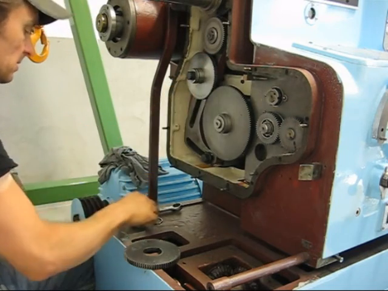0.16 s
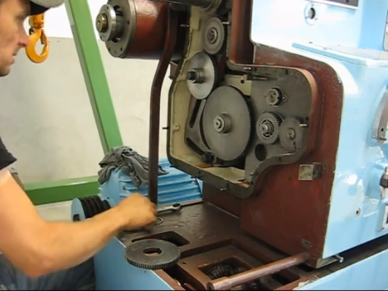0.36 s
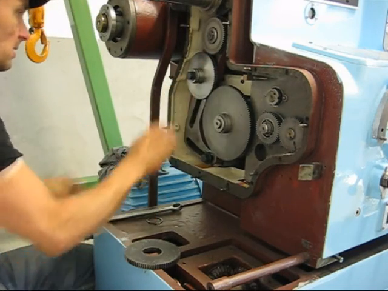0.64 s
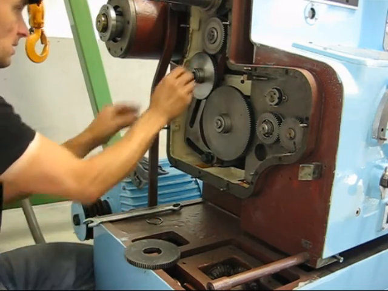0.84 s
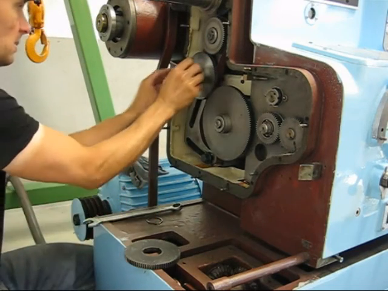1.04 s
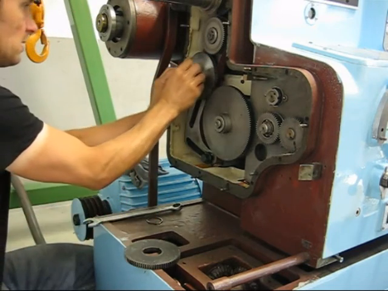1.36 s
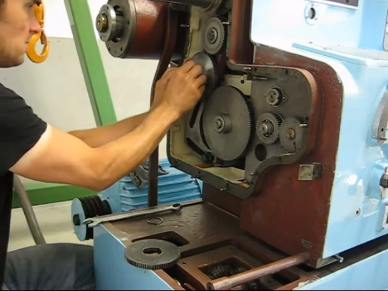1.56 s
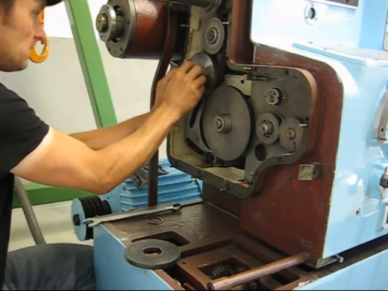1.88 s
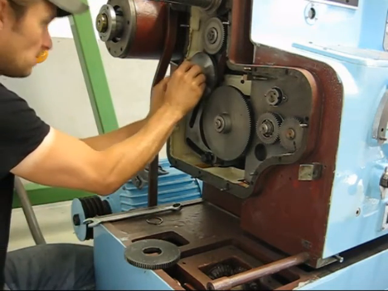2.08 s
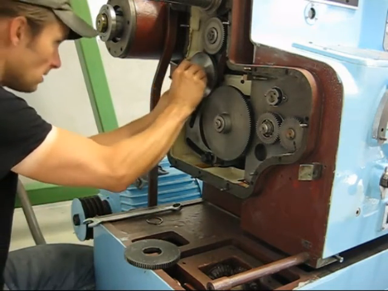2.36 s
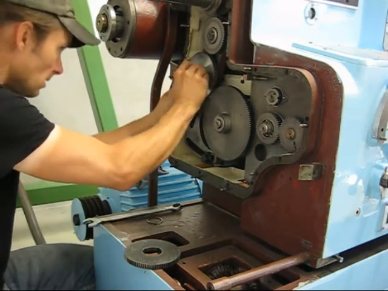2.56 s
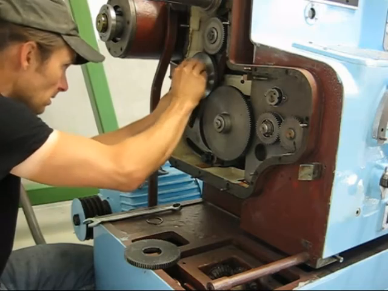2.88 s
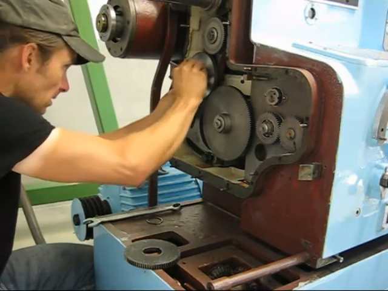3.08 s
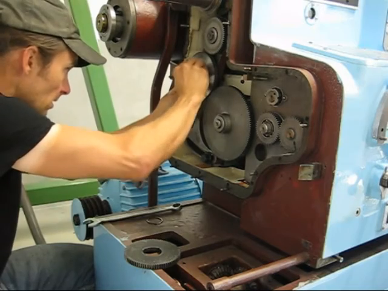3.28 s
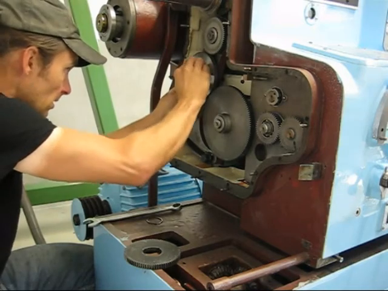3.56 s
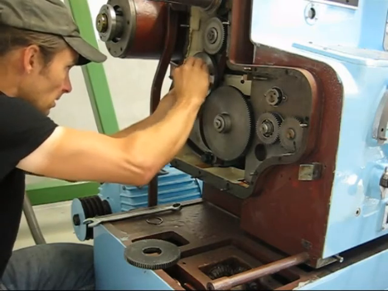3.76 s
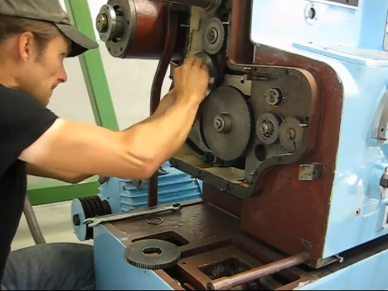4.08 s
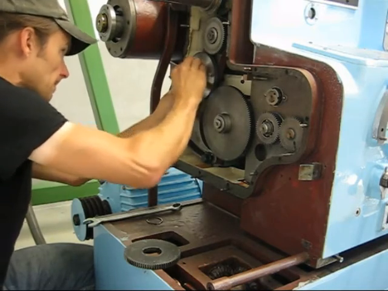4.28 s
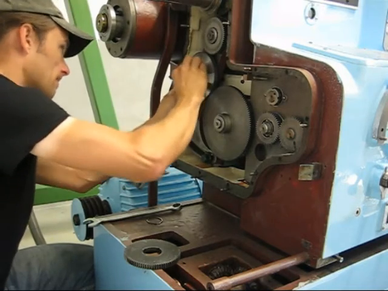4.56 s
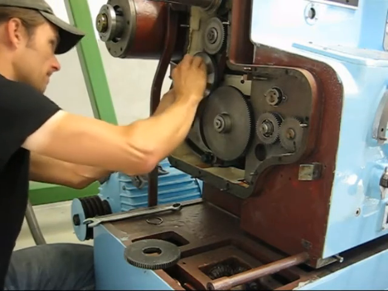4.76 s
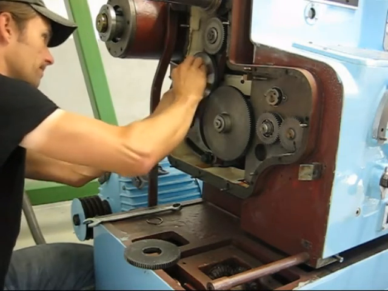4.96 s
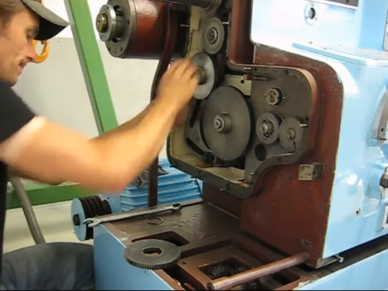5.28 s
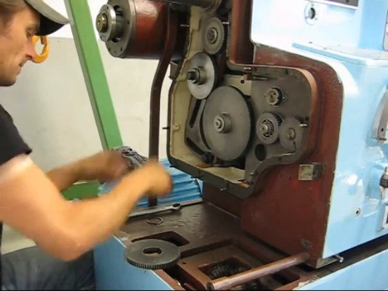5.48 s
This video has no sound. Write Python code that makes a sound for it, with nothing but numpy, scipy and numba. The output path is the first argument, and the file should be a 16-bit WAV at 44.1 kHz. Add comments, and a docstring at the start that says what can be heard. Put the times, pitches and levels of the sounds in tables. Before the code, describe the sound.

A hard-walled workshop with a constant bed of faint hiss, a thin, slightly buzzy high whine near 7.6 kHz and a low, wavering hum of distant motors. Soft brushing swells at about 0.15 and 0.5 s as a hand reaches for parts. At 0.73 s a crisp, dry steel snap, then a cluster of short, hand-damped gear clinks from 0.95 to 1.3 s, the brightest near 1.26 s. From 1.9 to 3.1 s come sparse, very faint knocks on the stud, some dull. A hard, bright double knock hits at 3.35 s, followed by quiet taps from 3.8 to 4.1 s. Small knocks at 4.4 s lead straight into a huge, clipped metallic snap at 4.42 s; the level ducks and the hall echo swells back, fading over about a second. A last faint tap comes at 5.55 s. Left channel only; the right is silent.

```python
"""A faint hiss, a thin whine and a wavering hum are heard first; soft brushing follows in a hard-walled workshop.
A steel change gear is fitted on a lathe stud by hand: parts snap home, the gear clinks and the stud knocks.
Clinks and knocks are noise bursts with decaying modes, snaps are shaped bursts, brushing is swelling noise.
The loudest snap makes the camera's limiter duck, so the room's echo swells back after it.
The camera adds the whine and hiss; only its left channel is live."""
import sys
import numpy as np
from scipy import signal
from scipy.fft import rfft, irfft
from scipy.io import wavfile
from numba import njit

SR = 44100
rng = np.random.default_rng(int(sys.argv[2]) if len(sys.argv) > 2 else 0)


def store_pcm(level_fs):
    """Save levels as 16-bit WAV."""
    pcm = np.round(np.clip(level_fs, -1, 1) * 32767).astype(np.int16)
    wavfile.write(sys.argv[1], SR, np.atleast_2d(pcm).T)


N = 248444

# spectrum of the workshop air at rest, relative: pitch_hz, level_db
AIR_SPECTRUM = [(25, -1), (100, 1), (300, 2), (600, 1.5), (850, 1), (1400, -1), (3300, -2), (4500, -3),
                (5400, 1), (6500, -3), (12000, -15.5)]
# hum of distant motors, rms before it wavers: pitch_hz, level_db
MOTOR_HUM = [(199, -66), (400, -65), (600, -68.5)]
# spectrum of the camera's hiss, relative: pitch_hz, level_db
HISS_SPECTRUM = [(3000, -23.5), (6800, -20.5), (8300, 0), (10000, 6), (11100, 1.5), (11700, -11),
                 (12600, -26)]
# partials of the camera's whine, relative: pitch_hz, level_db
WHINE_PARTIALS = [(7568.7, -36), (7860.9, -49)]
FRAME_HZ, FRAME_START_S = 30, .0283  # picture frames, which reset the whine
WHISTLE_HZ, TOP_HZ = 11046, 12200  # the camera's steady whistle, and its low-pass cutoff

# things brushing as the hand reaches for a part: centre_s, half_length_s, level_db
BRUSH_SWELLS = [(0.145, 0.12, -47), (0.47, 0.2, -46.5)]
# spectrum of the rubbing, relative: pitch_hz, level_db
BRUSH_SPECTRUM = [(500, -10), (2000, -2.5), (4000, 0.5), (6500, -1), (11000, -14)]

# steel parts snapping home: start_s, level_db, contact_decay_s, resonance_share (0-1)
SNAP_EVENTS = [(0.7338, -2.5, .0013, 0.0), (4.4218, 21.7, .0028, 1.0)]
# a snap's bare contact noise, relative: pitch_hz, level_db
SNAP_CONTACT_SPECTRUM = [(150, -30), (400, -17), (800, -11), (1400, -10.5), (2400, -8), (3100, 0),
                         (4200, 0), (5200, -3), (6600, -5.5), (7500, -12), (10000, -11), (12000, -22)]
# the seated parts, pressed tight and so heavily damped: pitch_hz, width_hz, level_db
SEATED_RESONANCES = [(390, 60, -18), (1080, 400, -18), (2130, 260, -7), (3120, 300, -8.5),
                     (4000, 1200, -21), (5450, 460, 6.5), (8950, 1100, -3.5), (10450, 700, 1),
                     (11550, 150, -11)]

# the gear touching its neighbours: start_s, level_db, contact_decay_s, ring_pitch_hz
GEAR_TOUCHES = [(0.9555, -20.5, .008, 4300), (0.9938, -17, .007, 3430), (1.062, -30.5, .009, 2390),
                (1.1688, -31.5, .013, 4200), (1.2645, -13.3, .0011, 4040), (1.3050, -23, .006, 2650),
                (1.3124, -14, .006, 2600)]
# a briefer touch is brighter: pitch of a typical contact, its decay, and the power law between them
GEAR_CONTACT_HZ, GEAR_CONTACT_S, BRIGHTENING = 2700, .005, .38
# the hand damps low modes most: ring level at the contact pitch above, and its rise per octave of ring pitch
GEAR_RING_DB, GEAR_RING_DB_PER_OCTAVE = -1, 16
# modes of the hand-held gear, relative: pitch_hz, level_db, t60_s
HELD_GEAR_MODES = [(2050, -8, 0.058), (2384, -9, 0.065), (3245, 0.5, 0.033), (3690, -3, .06),
                   (3875, 2.5, 0.03), (3868, -28, .25), (5190, 5.5, .036), (8600, -9, 0.027),
                   (11670, -3, 0.019)]
# the gear's contact noise, relative: pitch_hz, level_db
GEAR_CONTACT_SPECTRUM = [(150, -35), (400, -11), (700, 6), (1500, 1), (3500, 2.5), (5400, -3.5),
                         (6600, -15), (10000, -10), (12000, -14)]

# knocks on the stud: start_s, level_db, contact_pitch_hz, contact_decay_s
STUD_TOUCHES = [(1.9216, -36, 3500, .0034), (2.0159, -35.5, 2400, .0055), (2.2389, -46, 3000, .008),
                (2.3372, -38.5, 700, .008), (2.7448, -35.5, 1300, .0075), (3.1020, -39, 2100, .0055),
                (3.3428, -10, 4500, .0036), (3.3505, -22, 1700, .0135), (3.8108, -35, 720, .007),
                (3.981, -35, 2000, .0047), (4.064, -35.5, 10100, .004), (4.3870, -31.5, 1520, .0044),
                (4.4183, -21, 2800, .0024), (5.5504, -38.5, 2600, .0046)]
# a longer push rings the stud more: ring level at a typical contact decay, and its rise per doubling
STUD_RING_DB, STUD_CONTACT_S, STUD_RING_DB_PER_DOUBLING = -6, .005, 10.5
# contacts duller than DULL_HZ sound the bracket's low mode, all others the stud's ping
DULL_HZ, BRACKET_HZ, PING_HZ = 1100, 830, 3100
# modes of the stud and its bracket, relative: pitch_hz, level_db, t60_s
STUD_BRACKET_MODES = [(828, -6, 0.04), (1040, -4, 0.069), (1177, -7, 0.15), (2460, -2, 0.045),
                      (3090, 3, 0.041), (8560, -14, .05)]
# the stud's contact noise, relative: pitch_hz, level_db
STUD_CONTACT_SPECTRUM = [(150, -34), (450, -9), (850, 13), (2000, 8.5), (5300, 6.5), (6500, 2.5), (8800, 7),
                         (12000, -9)]

# reverberation time of the hall: pitch_hz, t60_s
HALL_T60 = [(200, 1), (800, 1.63), (2000, 1.12), (5000, 0.88), (8000, 0.73), (12000, 0.54)]


def undb(db):
    """Amplitude ratio: twenty decibels are a factor of ten."""
    return 10 ** (np.asarray(db) / 20)


def along(points, hz):
    """Logarithmic frequency: values between table points are interpolated by pitch interval."""
    f, value = np.transpose(points)
    return np.interp(np.log(hz + 1), np.log(f), value)


def noise(points, extra=lambda hz: 0):
    """Random phase: a given spectrum, plus extra colour in dB, with random phases is noise, here of rms 1."""
    hz = np.fft.rfftfreq(N, 1 / SR)
    magnitude = undb(along(points, hz) + extra(hz))
    y = irfft(magnitude * np.exp(2j * np.pi * rng.random(len(hz))), N)
    return y / y.std()


def background(air_db, waver_db):
    """Ambient noise: broadband workshop air, with tones of distant motors whose level wavers slowly."""
    t = np.arange(N) / SR
    slow = [(1, 0), (4, 0), (20, -60)]  # spectrum of the wavering: pitch_hz, level_db
    hum = 0
    for hz, db in MOTOR_HUM:
        level_db = db + waver_db * noise(slow, extra=lambda f: -f)
        hum = hum + np.sqrt(2) * undb(level_db) * np.sin(2 * np.pi * hz * t)
    return undb(air_db) * noise(AIR_SPECTRUM) + hum


def camera_noise(whine_db, hiss_db):
    """Phase resetting: each picture frame restarts the main whine, the weaker jumping with it; hiss is noise."""
    t = np.arange(N) / SR
    slip = WHINE_PARTIALS[0][0] * np.floor((t - FRAME_START_S) * FRAME_HZ) / FRAME_HZ  # in cycles
    whine = sum(undb(db) * np.sin(2 * np.pi * (hz * t - slip)) for hz, db in WHINE_PARTIALS)
    band = signal.butter(2, [7000, 8200], "band", fs=SR, output="sos")
    whine = signal.sosfilt(band, whine)
    whistle = undb(-61) * np.sin(2 * np.pi * WHISTLE_HZ * t)
    return np.sqrt(2) * (undb(whine_db) * whine + whistle) + undb(hiss_db) * noise(HISS_SPECTRUM)


def brushes():
    """Friction: rubbing surfaces make broadband noise, here in soft bell-shaped swells."""
    t = np.arange(N) / SR
    swell = sum(undb(db) * np.exp(-((t - centre) / half) ** 2) for centre, half, db in BRUSH_SWELLS)
    return noise(BRUSH_SPECTRUM) * swell


def chatter(t, decay, colour_db, count=3):
    """Repeated micro-impact: steel chattering on steel is random in fine timing, smooth in spectrum."""
    y = rng.standard_normal(len(t)) * np.exp(-t / decay)
    colour = undb(colour_db)
    fade = np.exp(-(t / (10 * decay)) ** 2)
    for _ in range(count):
        # impose the smooth spectrum, keep the phase, then keep the burst short
        y = irfft(colour * np.exp(1j * np.angle(rfft(y))), len(t)) * fade
    # same energy as a rms-1 noise decaying at this rate
    return y * np.sqrt(decay * SR / 2 / np.sum(y ** 2))


def snaps(low_cut_hz, high_cut_hz):
    """Damped resonance: a light snap is bare contact noise, a hard one drives the seated parts' broad peaks."""
    t = np.arange(SR // 4) / SR
    hz = np.fft.rfftfreq(len(t), 1 / SR) + 1
    power = 0
    for centre, width, db in SEATED_RESONANCES:
        power = power + undb(2 * db) / (1 + (2 * (hz - centre) / width) ** 2)
    power = power / (1 + (low_cut_hz / hz) ** 4) / (1 + (hz / high_cut_hz) ** 40)
    out = np.zeros(N + len(t))
    for start, db, decay, share in SNAP_EVENTS:
        share = np.clip(share, 0, 1)
        colour_db = share * 10 * np.log10(power) + (1 - share) * along(SNAP_CONTACT_SPECTRUM, hz)
        i = int(start * SR)
        out[i:i + len(t)] += undb(db) * chatter(t, decay, colour_db)
    return out[:N]


def favour(hz, centre_hz, slope_db):
    """Contact hardness: it favours one region, falling by slope_db per octave either side."""
    return -slope_db * np.abs(np.log2((hz + 1) / centre_hz))


def strikes(blows, modes, crack, crack_slope_db, muted_db):
    """Modal excitation: a blow chatters and rings the part, and where it lands mutes the other modes."""
    t = np.arange(SR // 4) / SR
    bins = np.fft.rfftfreq(len(t), 1 / SR)
    out = np.zeros(N + len(t))
    for start, db, contact_hz, decay, ring_db, ring_hz in blows:
        contact = chatter(t, decay, along(crack, bins) + favour(bins, contact_hz, crack_slope_db))
        ring = 0
        for hz, mode_db, t60 in modes:
            picked = np.exp(-(np.log2(hz / ring_hz) / 0.22) ** 2)  # 1 at the ring pitch
            level_db = mode_db + muted_db * (1 - picked) - 60 * t / t60
            ring = ring + undb(level_db) * np.sin(2 * np.pi * (hz * t + rng.random()))
        ring = ring * (1 - np.exp(-t / (0.19 * decay)))  # the ring builds while the faces touch
        i = int(start * SR)
        out[i:i + len(t)] += undb(db) * (contact + undb(ring_db) * ring)
    # parts this small radiate little bass
    return signal.sosfilt(signal.butter(2, 300, "high", fs=SR, output="sos"), out[:N])


def gear_clinks():
    """Contact time: a briefer clink is brighter; hand damping lets higher modes ring more freely."""
    blows = []
    for start, db, decay, ring_hz in GEAR_TOUCHES:
        contact_hz = GEAR_CONTACT_HZ * (GEAR_CONTACT_S / decay) ** BRIGHTENING
        ring_db = GEAR_RING_DB + GEAR_RING_DB_PER_OCTAVE * np.log2(ring_hz / GEAR_CONTACT_HZ)
        blows.append((start, db, contact_hz, decay, ring_db, ring_hz))
    return strikes(blows, HELD_GEAR_MODES, GEAR_CONTACT_SPECTRUM, crack_slope_db=3.5, muted_db=-15)


def stud_knocks():
    """Selective excitation: a longer push rings more; dull knocks sound the bracket, hard ones the stud."""
    blows = []
    for start, db, contact_hz, decay in STUD_TOUCHES:
        ring_db = STUD_RING_DB + STUD_RING_DB_PER_DOUBLING * np.log2(decay / STUD_CONTACT_S)
        ring_hz = BRACKET_HZ if contact_hz < DULL_HZ else PING_HZ
        blows.append((start, db, contact_hz, decay, ring_db, ring_hz))
    return strikes(blows, STUD_BRACKET_MODES, STUD_CONTACT_SPECTRUM, crack_slope_db=5, muted_db=-8)


def workshop(x, late_db, early_db, early_s, gap_s):
    """Reverberation: quick reflections off the machine, then the hall's long tail, whose treble dies first."""
    t = np.arange(SR * 3 // 2) / SR
    hz = np.fft.rfftfreq(len(t), 1 / SR)
    scatter = rfft(rng.standard_normal(len(t))) / np.sqrt(SR)
    centres = np.array(HALL_T60)[:, 0]
    early = undb(early_db) * np.exp(-t / early_s)
    response = 0
    for (_, t60), share in zip(HALL_T60, np.eye(len(HALL_T60))):
        # overlapping bands that sum to the whole spectrum
        band = irfft(scatter * np.interp(np.log(hz + 1), np.log(centres), share), len(t))
        response = response + band * (undb(late_db - 60 * t / t60) + early)
    response = response * (1 - np.exp(-(t / gap_s) ** 2))  # reflections fade in after the direct sound
    return x + signal.fftconvolve(x, response)[:N]


def scene():
    """Superposition: all handling sounds add in the room, picked up on the left channel alone."""
    handling = brushes() + snaps(low_cut_hz=480, high_cut_hz=11000) + gear_clinks() + stud_knocks()
    sound = workshop(handling, late_db=5, early_db=4, early_s=0.057, gap_s=.003)
    return np.array([sound + background(air_db=-48, waver_db=2.5), np.zeros(N)])


@njit
def held_peak(over_db, release_db, relax):
    """Peak holding: jumps to each peak over the ceiling, then sinks, fastest when it is highest."""
    held, cut = np.empty(len(over_db)), 0.
    for i in range(len(over_db)):
        cut = max(over_db[i], cut - release_db - relax * cut, 0.)
        held[i] = cut
    return held


def limiter(x, ceiling_db, attack_s, release_db_per_s, relax_s):
    """Delayed gain control: the cut lags the peak, so a loud snap's front clips, unevenly, before it ducks."""
    over_db = 20 * np.log10(np.abs(x) + 1e-9) - ceiling_db
    cut_db = held_peak(over_db, release_db_per_s / SR, 1 / (relax_s * SR))
    lag = np.exp(-1 / (attack_s * SR))
    late_cut_db = signal.lfilter([1 - lag], [1, -lag], cut_db)
    return np.clip(x * undb(-late_cut_db), -.77, .84)


def record(dry):
    """Signal chain: the camera limits the live channel, adds its own whine and hiss and cuts the top."""
    left = limiter(dry[0], ceiling_db=-1.3, attack_s=.003, release_db_per_s=68, relax_s=.24)
    left = left + camera_noise(whine_db=-1.5, hiss_db=-47.5)
    low_pass = signal.firwin(111, TOP_HZ, fs=SR)
    return signal.fftconvolve(np.array([left, dry[1]]), low_pass[None], "same", axes=1)


dry = scene()
out = record(dry)
store_pcm(out)
```